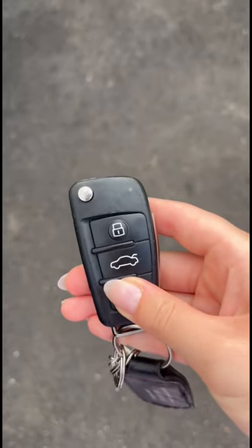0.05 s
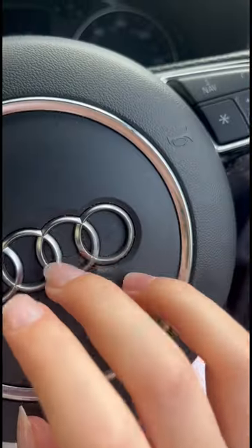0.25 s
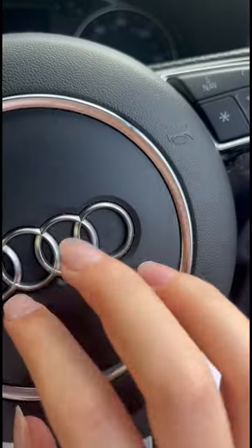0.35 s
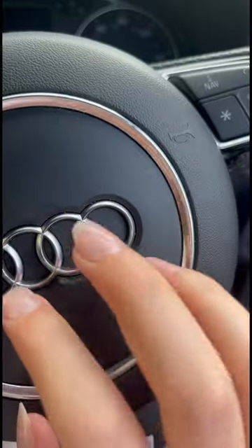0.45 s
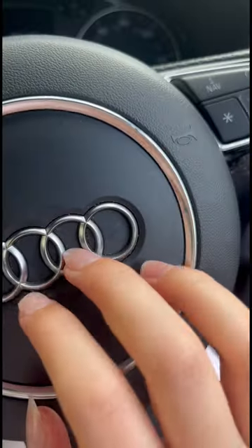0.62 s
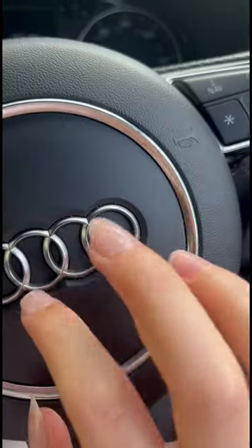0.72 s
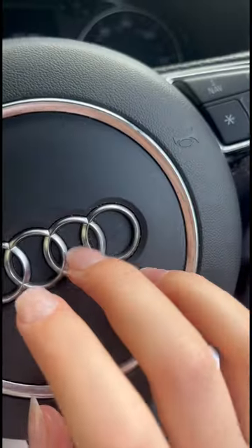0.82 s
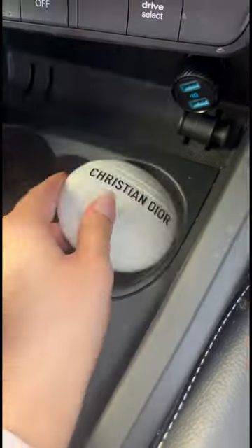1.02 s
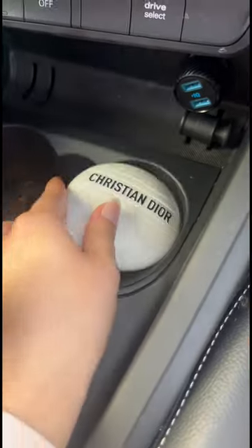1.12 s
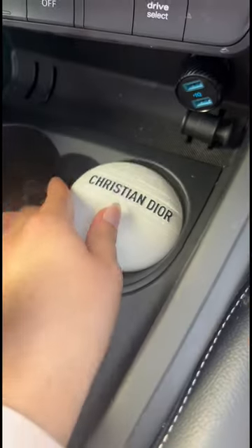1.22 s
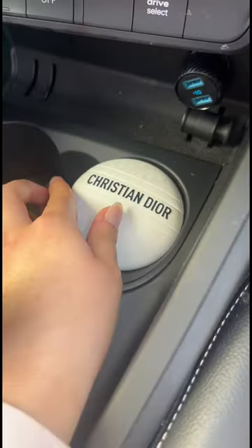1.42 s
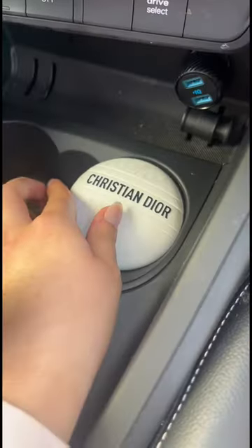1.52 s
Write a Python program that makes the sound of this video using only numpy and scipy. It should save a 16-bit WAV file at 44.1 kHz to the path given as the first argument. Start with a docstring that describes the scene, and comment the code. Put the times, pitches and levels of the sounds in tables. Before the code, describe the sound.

Close fingernail taps click on a car's steering wheel badge, then knock on a plastic case.

```python
"""Close fingernail taps in a quiet parked car. First, over a low outdoor rumble, comes a brief, thin, high
squeak or bird chirp, and a key fob ticks in the hand. Then the scene changes to the hush of the cabin, and
nails tap the steering wheel's emblem in three quick groups: each impact gives a sharp click, a brief ring and a
hollow thump of the padded hub. Last, after another change of scene, fingers brush and tap a small plastic case
in the console, exciting its modes. Reflections in the cabin add a short, dull ring to the taps and the
brushing."""
import sys
import numpy as np
from scipy import signal
from scipy.fft import rfft, irfft, next_fast_len
from scipy.io import wavfile

SR = 44100
rng = np.random.default_rng(int(sys.argv[2]) if len(sys.argv) > 2 else 0)


def bounce(signal):
    """Save signal as a 16-bit WAV file at the path given by the first command-line argument."""
    frames = np.transpose(np.atleast_2d(signal))
    limited = np.clip(frames, -1, 1)
    pcm = np.round(limited * 32767).astype(np.int16)
    wavfile.write(sys.argv[1], SR, pcm)


N = 68355

# background spectra outdoors, at the wheel and at the console (frequency [Hz], relative density [dB])
OUTDOOR_SPECTRUM = [(30, 4), (65, 1.5), (150, -2.5), (290, -11.5), (480, -26.5), (900, -30), (2100, -45.5),
                    (3200, -55), (7000, -63), (16000, -77)]
CABIN_HUM_SPECTRUM = [(30, -3.5), (60, -3), (130, -9.5), (280, -32), (600, -32), (1200, -43), (2100, -46.5),
                      (2900, -54), (7000, -62.5), (13000, -66), (16000, -79)]
CONSOLE_HUM_SPECTRUM = [(30, 4), (55, 7.5), (110, -7.5), (170, -7), (300, -20.5), (550, -17.5),
                        (1000, -26.5), (1400, -34), (2100, -31), (2800, -51), (7000, -56), (13000, -63),
                        (16000, -75)]
# a thin squeak or bird chirp near 7 kHz, heard with the key fob's ticks
# (time [s], level [dB], centre [Hz], width [octaves], t60 [s])
CHIRP_AND_TICKS = [(0.0205, -18, 7110, .06, 0.069), (0.02, -28.5, 5420, 0.14, .05),
                   (0.021, -32, 12500, 0.26, 0.054), (0.062, -25, 1900, 0.78, 0.005),
                   (0.1335, -7.5, 1340, 0.6, 0.018), (0.2050, -23, 1900, 0.47, 0.018)]
# taps on the emblem (time [s], thump level [dB], thump pitch [Hz], extra gain of the deeper swells [dB],
# click and ring level [dB], treble corner [Hz], spot [0 middle to 1 end])
EMBLEM_TAPS = [(0.2379, -14, 502, 2, -8, 11000, 0.06), (0.2815, -38.5, 510, -5, -29.5, 11000, 0.9),
               (0.331, -21, 450, 1.5, -13, 5560, 1), (0.5183, -34, 454, 2.5, -34, 2500, 0.97),
               (0.5479, -7, 492.5, -1, -1, 15000, .05), (0.6243, -21.5, 475, 2, -7, 6060, 0.93),
               (0.8250, -20, 469, 4.5, -17, 6500, 1), (0.8499, -4, 516, -10.5, 1.5, 14700, 0.35),
               (0.9079, -10, 502, 1.5, -5.5, 7140, 0.29)]
# damped swells of the padded hub (frequency [multiple of the thump pitch], level [dB], crest time [s])
HUB_SWELLS = [(1.0, -0.5, 0.0033), (.68, -11, 0.00544), (.47, -17, 0.0082), (.28, -25, 0.012)]
# spectrum of a nail's click on the emblem (frequency [Hz], gain [dB])
EMBLEM_CLICK_SPECTRUM = [(300, -31), (1000, 3), (2100, 7), (3300, -17.5), (4500, -7.5), (5800, -1),
                         (7000, -0.5), (10000, -9.5), (13200, 3), (14800, -13), (17000, -17.5)]
# modes of emblem and cover
# (frequency [Hz], level struck mid [dB], level struck at the end [dB], t60 [s], left minus right [dB])
EMBLEM_MODES = [(790, -14, -54.5, 0.023, -30), (988, -16.5, -15, 0.018, -2), (1150, -33, -33, 0.042, -3.5),
                (1363, -48.5, -27, 0.044, -11.5), (1652, -19, -27, 0.013, -6.5),
                (1986, -16.5, -17, 0.0096, 0.5), (2711, -44.5, -43.5, 0.036, 6),
                (3200, -44, -28.5, 0.0098, -21.5), (4500, -16.5, -28.5, 0.012, -39),
                (4980, -29.5, -37.5, 0.032, -8.5), (5190, -15.5, -37, 0.004, -12.5)]
# spectrum of the cabin's reflections (frequency [Hz], gain [dB])
REFLECTION_SPECTRUM = [(80, -11.5), (200, -13), (450, -21), (800, -13.5), (1300, -20), (2000, -22.5),
                       (3300, -12), (4700, -19), (8000, -19), (10300, -22), (12500, -29), (15000, -29.5)]
# finger strokes on the case (time [s], duration [s], first level [dB], last level [dB])
BRUSH_STROKES = [(1.016, 0.077, -54, -59), (1.067, .1, -68.5, -62.5), (1.192, 0.078, -63.5, -49)]
# spectrum of the sliding friction (frequency [Hz], gain [dB])
FRICTION_SPECTRUM = [(200, 9.5), (550, 14), (1300, 8), (2500, -0.5), (4800, -13.5), (6000, -9), (7800, -11),
                     (10300, -17), (12800, -14), (14200, -22), (16500, -38)]
# knocks on the case (time [s], body level [dB], pitch [ratio], body cutoff [Hz],
# click level [dB], click cutoff [Hz], spot [0 lid to 1 rim])
CASE_KNOCKS = [(1.0243, -17.5, .92, 970, -35, 9240, 0.063), (1.032, -6.5, 0.736, 230, -54, 3000, .05),
               (1.0783, 1, 0.9404, 3500, -8.5, 5960, 0.11), (1.1160, -47, 0.63, 1500, -26.5, 11400, 0.32),
               (1.2571, 2, 0.93, 3640, -7, 10000, 0.96)]
# modes of the case in its holder
# (frequency [Hz], level struck on lid [dB], level struck on rim [dB], t60 [s], left minus right [dB])
CASE_MODES = [(116.3, -20.5, -34, .16, 1), (165.8, -23, -23, 0.11, -1), (259.6, -14, -22.5, 0.091, -3),
              (393.6, -9.5, -13.5, 0.043, -5.5), (485, -14.5, -25, 0.032, 5.5),
              (599, -11.5, -14.5, 0.04, -12), (837, -20.5, -15, 0.02, 1), (1069, -28.5, -34, 0.037, 9),
              (1373, -28.5, -32.5, 0.034, 4), (1592, -30, -55, 0.028, 6.5), (1932, -30, -37.5, 0.028, 4.5),
              (2714, -39.5, -57, 0.055, -2), (3234, -40, -29.5, 0.032, -9.5),
              (5335, -33.5, -33.5, 0.03, -24)]
# spectrum of a nail's click on the case (frequency [Hz], gain [dB])
CASE_CLICK_SPECTRUM = [(300, 21.5), (1000, 1.5), (2000, 13), (3500, -5.5), (5000, -5), (6200, -1),
                       (8000, -9), (13000, -6), (16500, -18)]

OUTDOORS_END_S, CABIN_START_S, CONSOLE_START_S, CROSSFADE_S = .2, .228, 1.015, .014
BUILD_S, BUILD_REFERENCE_HZ, BUILD_EXPONENT = .015, 200, 1.436  # low modes take longer to build up
CASE_LEFT_DELAY_S = -.000252  # negative: the case is heard first on the left
FFT_SIZE = 2 * next_fast_len(N)
BIN_HZ = np.arange(FFT_SIZE // 2 + 1) * SR / FFT_SIZE


def undb(db):
    """Amplitude ratio of a level in decibels."""
    return 10 ** (np.asarray(db) / 20)


def age(start):
    """Seconds elapsed since an onset, zero before it."""
    return np.maximum(np.arange(N) / SR - start, 0)


def decay(t, t60):
    """Exponential damping: the level falls 60 dB in t60 seconds."""
    return np.exp(-np.log(1000) * t / t60)


def colour(x, points):
    """Minimum-phase filter through points of (frequency [Hz], gain [dB])."""
    hz, db = np.array(points, float).T
    curve_db = np.interp(np.log(BIN_HZ + 1), np.log(hz), db)
    cepstrum = irfft(np.log(undb(curve_db)))
    cepstrum[1:FFT_SIZE // 2] *= 2  # folding the cepstrum makes the filter causal
    cepstrum[FFT_SIZE // 2 + 1:] = 0
    return irfft(rfft(x, FFT_SIZE) * np.exp(rfft(cepstrum)))[..., :N]


def lowpass(x, hz, order=2):
    """Butterworth low-pass: above the cutoff the level falls 6 dB an octave per order."""
    return signal.sosfilt(signal.butter(order, hz, fs=SR, output="sos"), x + 1e-18)


def stereo(x, left_delay_s, left_db=0):
    """Differences of arrival time and level between two microphones give a source its direction."""
    delay = np.exp(-2j * np.pi * BIN_HZ * left_delay_s)
    left = irfft(rfft(x, FFT_SIZE) * delay)[:N]
    return np.array([undb(left_db) * left, x])


def rumble(spectrum, db, diffuse_hz=900):
    """Diffuse noise field: long waves reach both microphones alike, short waves differ."""
    mid, side = colour(rng.standard_normal((2, N)), spectrum)
    side = .65 * (side - lowpass(side, diffuse_hz, order=1))
    return undb(db) * np.array([mid + side, mid - side]) / np.std(mid)


def background():
    """Stationary noise in turn: open air, then the cabin at the wheel, then at the console."""
    def rise(start):
        return np.minimum(age(start) / CROSSFADE_S, 1)

    outdoors = rumble(OUTDOOR_SPECTRUM, db=-40.5) * (1 - rise(OUTDOORS_END_S - CROSSFADE_S / 2))
    at_wheel = rise(CABIN_START_S - CROSSFADE_S) * (1 - rise(CONSOLE_START_S - CROSSFADE_S))
    cabin_hum = rumble(CABIN_HUM_SPECTRUM, db=-49) * at_wheel
    console_hum = rumble(CONSOLE_HUM_SPECTRUM, db=-50.5) * rise(CONSOLE_START_S)
    return outdoors + cabin_hum + console_hum


def burst(start, t60, crack_share=0, crack_t60=.0025):
    """Damped noise of unit energy, of which a share may go to a sharp crack at the onset."""
    t = age(start)
    crack_power = crack_share * decay(t, crack_t60) ** 2 / crack_t60
    vibration_power = (1 - crack_share) * decay(t, t60) ** 2 / t60
    noise = rng.standard_normal(N) * (t > 0) * np.sqrt(crack_power + vibration_power)
    return noise / np.sqrt(np.sum(noise ** 2))


def chirp_and_key_fob(skirt_db=-18, far_db=-55):
    """Bandwidth sets timbre: a narrow burst is a thin squeak or chirp, short wide ones the fob's ticks."""
    sounds = 0
    for start, db, centre_hz, octaves, t60 in CHIRP_AND_TICKS:
        band_hz = centre_hz * 2. ** (octaves * np.array([-4, -2, 0, 2, 4]))
        band = list(zip(band_hz, [far_db, skirt_db, 0, skirt_db, far_db]))
        sounds = sounds + undb(db) * colour(burst(start, t60), band)
    return sounds


def hub_thumps(steepness=4.5):
    """Heavy damping: after each tap the padded hub swells and dies away in about three cycles."""
    thumps = 0
    for start, thump_db, thump_hz, deep_db, *_ in EMBLEM_TAPS:
        t = age(start)
        for k, (multiple, db, crest_s) in enumerate(HUB_SWELLS):
            gain = undb(thump_db + db + deep_db * (k > 0))
            swell = (t / crest_s * np.exp(1 - t / crest_s)) ** steepness
            thumps = thumps - gain * swell * np.sin(2 * np.pi * thump_hz * multiple * (t - crest_s))
    return stereo(thumps, left_delay_s=.00036, left_db=-2.5)


def soft_contact(x, corner_hz):
    """Contact time limits bandwidth: a flatter nail lands more softly and excites less treble."""
    return colour(x, [(corner_hz / 2, 0), (corner_hz, -3), (corner_hz * 2, -19), (corner_hz * 4, -38)])


def modal_ring(start, modes, pitch, spot):
    """Superposition of damped modes; the point of impact sets how strongly each is excited."""
    t, ring = age(start), 0
    for k, (hz, first_db, second_db, t60, left_db) in enumerate(modes):
        db = np.interp(spot, [0, 1], [first_db, second_db])
        gains = (-1) ** k * undb([[db + left_db], [db]])  # successive modes alternate in sign
        build_s = BUILD_S * (BUILD_REFERENCE_HZ / hz) ** BUILD_EXPONENT
        envelope = (1 - np.exp(-(t / build_s) ** 2)) * decay(t, t60)
        ring = ring + gains * envelope * np.sin(2 * np.pi * hz * pitch * t)
    return ring


def emblem_taps(detune=.01527):
    """Impulsive excitation: each nail gives a broadband click and sets the emblem's modes ringing."""
    clicks, rings = 0, 0
    for start, *_, db, corner_hz, spot in EMBLEM_TAPS:
        click = burst(start, t60=.018, crack_share=.72)
        clicks = clicks + undb(db) * soft_contact(click, corner_hz)
        pitch = 1 + detune * rng.uniform(-1, 1)  # finger pressure shifts the modes from tap to tap
        ring = modal_ring(start, EMBLEM_MODES, pitch, spot)
        rings = rings + undb(db) * soft_contact(ring, corner_hz)
    return rings + stereo(colour(clicks, EMBLEM_CLICK_SPECTRUM), left_delay_s=-.000238)


def cabin_reflections(direct, low_t60=.15, high_t60=.081, split_hz=400, onset_s=.0076, width=.95):
    """Reverberation: upholstery absorbs the reflections quickly, the treble sooner than the bass."""
    t, reflections = age(0), []
    onset = np.minimum(t / onset_s, 1) ** 2
    shared = rng.standard_normal(N)
    for channel in direct:
        noise = (shared + width * rng.standard_normal(N)) / np.hypot(1, width)
        low = lowpass(noise, split_hz)
        tail = (low * decay(t, low_t60) + (noise - low) * decay(t, high_t60)) * onset
        response = colour(tail / np.sqrt(np.sum(tail ** 2)), REFLECTION_SPECTRUM)
        reflections.append(signal.fftconvolve(channel, response)[:N])
    return np.array(reflections)


def finger_brushing(grain_db=4, edge_s=.014):
    """Sliding friction: fingertips on the case make a fine hiss of randomly varying amplitude."""
    envelope = 0
    for start, duration, first_db, last_db in BRUSH_STROKES:
        t = age(start)
        gate = np.clip(np.minimum(t, duration - t) / edge_s, 0, 1)
        envelope = envelope + gate * undb(np.interp(t, [0, duration], [first_db, last_db]))
    grains = rng.standard_normal(N) * undb(grain_db * rng.standard_normal(N))
    return stereo(colour(envelope * grains, FRICTION_SPECTRUM), CASE_LEFT_DELAY_S)


def case_knocks():
    """Free vibration: each knock clicks and leaves the hollow case ringing in its holder."""
    body, clicks = 0, 0
    for start, body_db, pitch, body_hz, click_db, click_hz, spot in CASE_KNOCKS:
        ring = modal_ring(start, CASE_MODES, pitch, spot)
        body = body + undb(body_db) * lowpass(ring, body_hz)
        click = burst(start, t60=.034, crack_share=.1)
        clicks = clicks + undb(click_db) * lowpass(click, click_hz, order=1)
    return body + stereo(colour(clicks, CASE_CLICK_SPECTRUM), CASE_LEFT_DELAY_S)


def scene():
    """Linear superposition of background, chirp, key fob, direct sound in the car and its reflections."""
    direct = hub_thumps() + emblem_taps() + finger_brushing() + case_knocks()
    return background() + chirp_and_key_fob() + direct + cabin_reflections(direct)


def record(dry, low_cut_hz=37.4, high_cut_hz=16900):
    """Band limiting: the phone cuts the deepest bass and the top of the treble."""
    bass_cut = signal.butter(4, low_cut_hz, "high", fs=SR, output="sos")
    treble_cut = signal.ellip(8, .2, 80, high_cut_hz, fs=SR, output="sos")
    return signal.sosfilt(treble_cut, signal.sosfilt(bass_cut, dry))


dry = scene()
out = record(dry)
bounce(out)
```